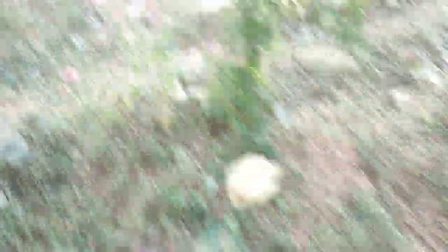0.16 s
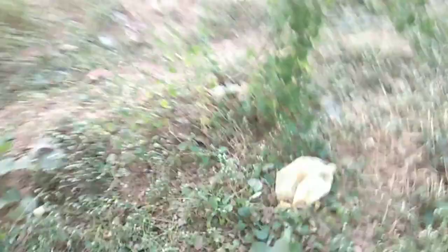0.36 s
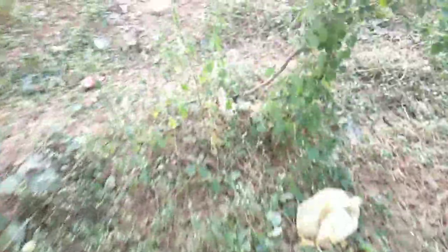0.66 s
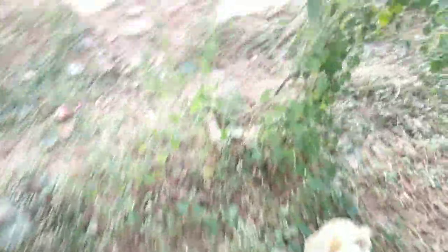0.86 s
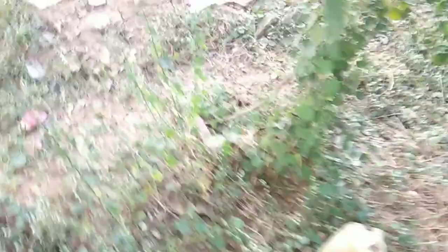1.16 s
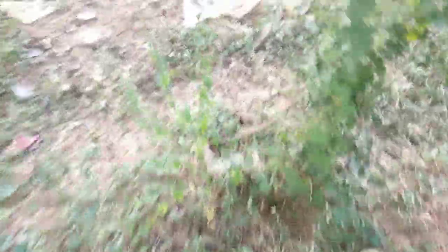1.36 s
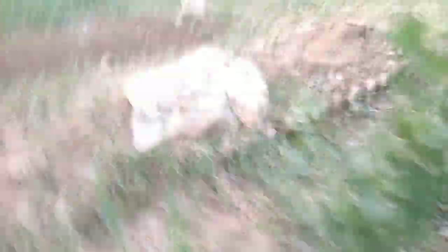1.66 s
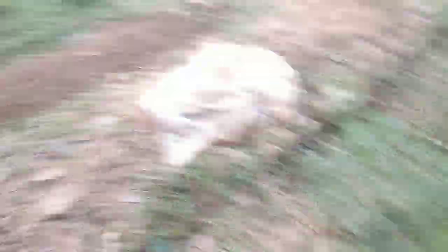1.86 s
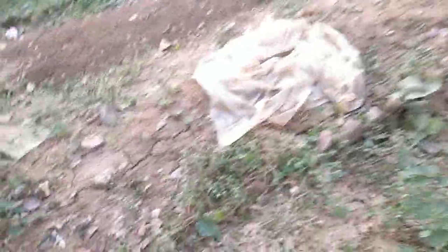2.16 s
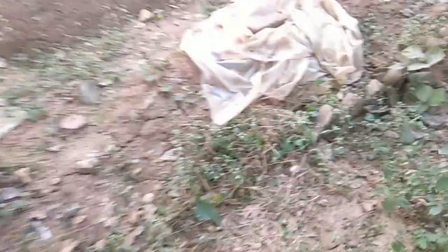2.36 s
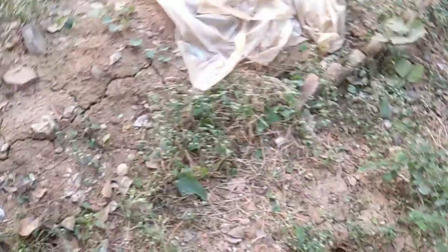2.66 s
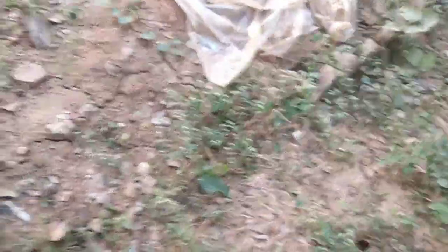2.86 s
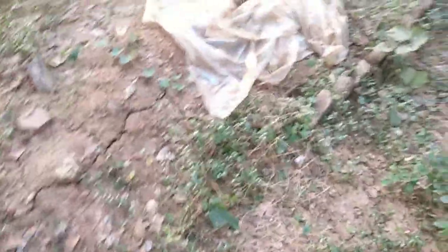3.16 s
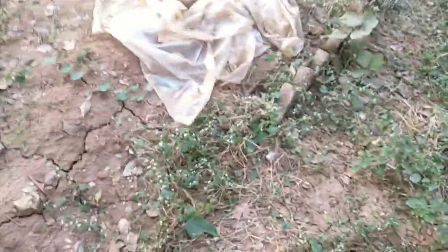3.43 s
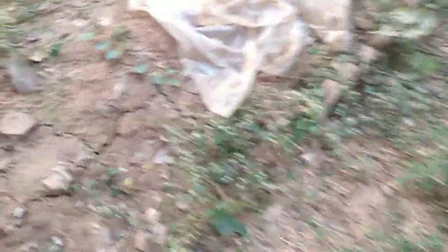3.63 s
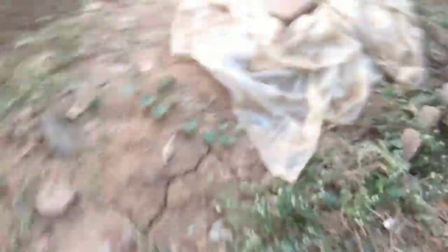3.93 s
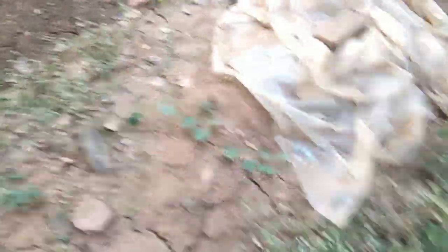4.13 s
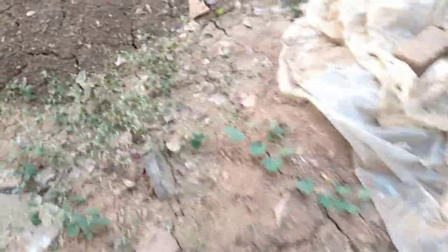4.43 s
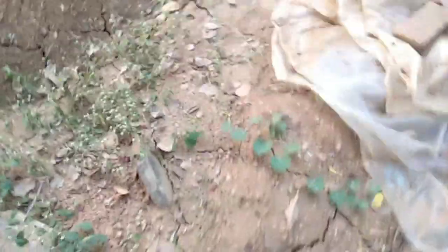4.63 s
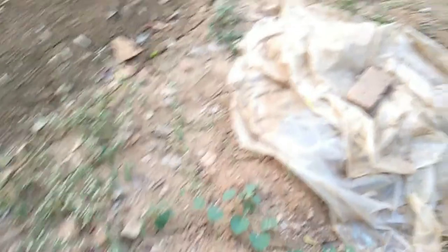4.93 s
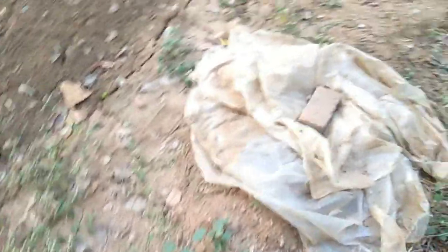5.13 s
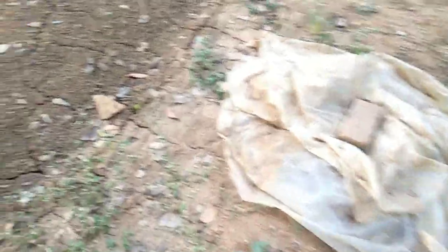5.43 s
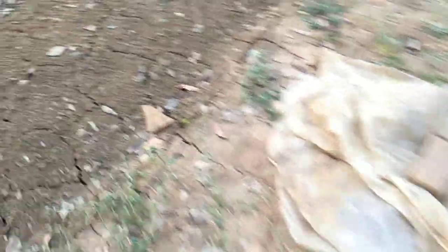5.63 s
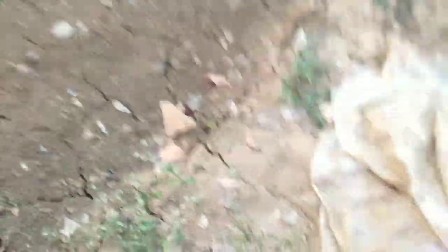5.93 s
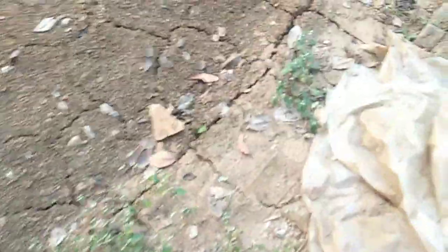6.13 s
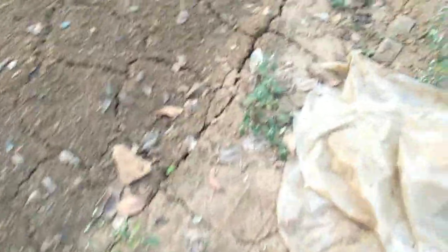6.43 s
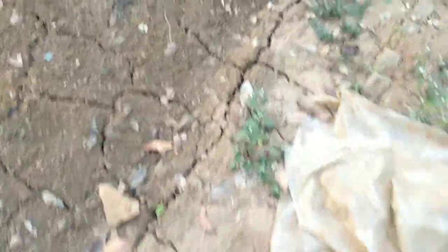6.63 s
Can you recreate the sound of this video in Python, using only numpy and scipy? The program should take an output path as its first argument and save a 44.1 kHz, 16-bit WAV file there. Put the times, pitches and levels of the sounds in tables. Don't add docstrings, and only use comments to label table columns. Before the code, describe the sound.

A walker moves through dry weeds over bare earth. First come scattered crunches and a low air thump at one second, then leafy brushing with short high chirps about four times a second. A cluster of sharp snaps peaks midway through the later part, followed by lighter rustling and two last crunches. Outdoors and dry, with no room echo, taken close on a small, thin-sounding handheld device.

```python
import sys
import numpy as np
from scipy import signal
from scipy.fft import rfft, irfft
from scipy.io import wavfile
from scipy.ndimage import uniform_filter1d

SR = 44100
rng = np.random.default_rng(int(sys.argv[2]) if len(sys.argv) > 2 else 0)


def generate_wav(sig):
    pcm = np.round(np.clip(np.atleast_2d(sig).T, -1, 1) * 32767).astype(np.int16)
    wavfile.write(sys.argv[1], SR, pcm)


def gain_from_decibels(decibels):
    exponent = np.asarray(decibels, float) / 20
    return 10 ** exponent


N = 299120

# full_weight_s, rise_s, fall_s, crackle_db, soil_share_db
STEPS = [(0.279, 0.023, 0.2, -36.5, -8), (.56, 0.05, 0.19, -64.5, 8), (.86, 0.15, 0.086, -53, 3),
         (0.944, 0.092, 0.077, -40, -8), (0.999, 0.18, 0.11, -36, -8.5), (1.38, 0.12, 0.23, -56.5, 4),
         (1.58, 0.022, 0.69, -52.5, -7.5), (1.769, 0.15, 0.17, -35.5, -11), (1.902, 0.049, 0.2, -48, -6),
         (2.489, 0.057, 0.2, -36, -9), (2.62, 0.039, 0.33, -45, -27), (2.755, 0.076, 0.043, -38, -18),
         (2.96, 1, 0.031, -54, -18), (3.12, 0.2, 0.11, -68, -20), (3.875, 0.046, 0.14, -36, -6.5),
         (3.909, 0.064, 0.072, -35.5, -27), (4.042, 0.15, 0.092, -53, 1), (4.494, 0.033, 0.18, -27.5, -24),
         (4.56, 0.094, 0.1, -37, -4.5), (4.62, 0.27, 0.023, -45, -20), (5.864, 0.045, 0.086, -42.5, -8.5),
         (6.775, 0.11, .1, -39, -9)]
STEP_LEAF_DB, STEP_HUSK_DB, STEP_STEM_DB = 1, -22.5, -19
# start_s, hold_s, swish_db, bright_share_db, husk_share_db
BRUSHES = [(0, 0.056, -55.5, -45, -44), (0.125, 0.17, -65.5, 1, -10), (0.548, 0.085, -59.5, -6, -6),
           (0.8, 0.12, -63.5, -4, 6), (1.538, 0.19, -44.5, -47, -22), (1.947, .12, -40.5, -57, -20),
           (2.144, 0.14, -42.5, -21.5, -48), (2.393, 0.071, -41.5, -20, -22), (2.483, 0.17, -53, -20, -1),
           (2.678, 0.15, -45.5, -25, -14), (3.032, 0.16, -49.5, -17, -15.5), (3.27, 0.075, -48, -20.5, -20),
           (3.347, 0.25, -43, -23, -17), (3.711, 0.15, -53.5, -11.5, -24),
           (4.154, .04, -35.5, -27.5, -20.5), (4.196, 0.097, -33, -20.5, -24.5),
           (4.414, 0.028, -44, -14, -20), (4.678, 0.051, -41.5, -10.5, -27),
           (4.78, 0.048, -34.5, -18.5, -20), (4.889, 0.11, -39, -20.5, -21), (5.206, 0.06, -56, -4.5, -14),
           (5.405, 0.11, -53, -9.5, -18), (5.671, 0.11, -49.5, -12, -26), (6.246, 0.13, -39, -12.5, -24),
           (6.674, 0.037, -50, -15, -13), (6.718, .08, -40, -10, -13)]
BRUSH_RISE_S, BRUSH_FALL_S = 0.04, 0.085
SWEEP_STALK_DB, SWEEP_STEM_DB = -4.5, 5
# start_s, hold_s, grind_db
SCUFFS = [(0.024, 0.12, -58.5), (0.317, 0.022, -44), (0.799, 0.066, -57.5), (1.405, 0.059, -49),
          (1.718, 0.062, -55), (1.976, 0.18, -65.5), (2.19, 0.083, -76), (2.645, 0.14, -59.5),
          (3.006, 0.039, -70), (3.31, 0.19, -67.5), (3.683, 0.099, -60), (4.259, 0.44, -63.5),
          (4.864, 0.64, -66.5), (5.615, 0.083, -60.5), (5.75, 0.041, -56), (5.894, 0.016, -58),
          (6.095, 0.039, -73), (6.298, 0.025, -60.5), (6.476, 0.19, -65.5)]
SCUFF_RISE_S, SCUFF_FALL_S = 0.018, 0.081
SWING_DB = 30
TAIL_BEND = 1.183
# rest_db of stalks, leaves, soil, husks and stems
REST_LEVELS = (-80.5, -73, -74, -74.5, -88)

# pitch_hz, level_db (per Hz)
STALK_TONE = [(2710, -33), (4600, -11.5), (5310, -4), (6110, -10), (7340, -2.5), (8790, -5.5), (9970, -10),
              (11100, -9.5), (14400, -59.5), (22000, -120)]
# pitch_hz, level_db (per Hz)
LEAF_TONE = [(1530, -62), (2600, -9), (2750, -1), (3510, -1.5), (3720, 0.5), (4800, -11), (5000, -6),
             (6500, -33), (11000, -120)]
# pitch_hz, level_db (per Hz)
SOIL_TONE = [(120, -18), (200, -8), (284, -8.5), (382, -4.5), (1150, -4), (1400, -23), (1900, -34.5),
             (2970, -120)]
# pitch_hz, level_db (per Hz)
HUSK_TONE = [(900, -47.5), (1300, -2), (1900, -4.5), (2300, 0), (2700, -7.5), (4000, -44)]
# pitch_hz, level_db (per Hz)
STEM_TONE = [(3500, -49), (4700, -11), (5200, -6), (5900, -7), (6500, -17.5), (7300, -8), (8000, -24.5),
             (11000, -39.5)]

# start_s, through_leaves_db, through_stalks_db
TWIGS = [(0.273, -48, -10), (0.441, -39, -32), (0.792, -54, -42), (0.853, -52, -25), (.932, -42, -23.5),
         (0.982, -38, -16), (1.365, -35, -32), (1.419, -35, -52), (1.715, -29, -33), (1.781, -24, -28),
         (2.146, -45, -30), (2.388, -30, -36), (2.472, -19.5, -36), (2.612, -23.5, -17), (2.683, -46, -28),
         (2.729, -40, -23), (2.75, -24, -16), (2.956, -41, -28.5), (3.062, -39, -37), (3.118, -46, -28.5),
         (3.261, -32, -62), (3.861, -41, -40), (3.908, -18.5, -32), (3.968, -29, -49), (4.422, -33, -47),
         (4.457, -42, -47.5), (4.478, -21, -27), (4.487, -14.5, -23), (4.498, -10, -3.5), (4.508, -16, -14),
         (4.514, -23, -28), (4.617, -43, -23), (4.693, -45.5, -29), (4.552, -13.5, -48), (5.778, -33, -57),
         (5.852, -29, -24), (5.865, -33, -14), (5.877, -28, -41), (6.085, -50, -61), (6.112, -49, -62),
         (6.308, -40, -27), (6.576, -52, -63), (6.663, -38, -36), (6.763, -23, -42)]
# start_s, level_db
CLODS = [(0.271, -43), (0.31, -54), (0.359, -36), (0.575, -54), (0.795, -34), (0.848, -54), (0.933, -43),
         (0.985, -44), (1.415, -43), (1.439, -51), (1.465, -57), (1.757, -26), (1.779, -26), (2.472, -41),
         (2.491, -27), (2.613, -47), (2.634, -51), (3.864, -39), (3.877, -33), (3.906, -19.5), (3.931, -53),
         (3.967, -36), (4.0, -54), (4.307, -44), (4.481, -42), (4.503, -34.5), (4.536, -35), (4.573, -39),
         (5.779, -47), (5.863, -34.5), (6.585, -42), (6.761, -55)]
# start_s, peak_db, pitch_hz
PODS = [(1.3658, -41.5, 2830), (1.409, -42, 2930), (1.5309, -42, 3640), (2.2363, -42, 4080),
        (3.046, -46, 3090), (3.4326, -39.5, 3800), (3.4467, -40, 3730), (3.718, -42.5, 4090),
        (3.7713, -44, 4120), (4.3615, -42, 3010), (4.4224, -32.5, 3070), (5.7795, -39, 3050),
        (5.8642, -32.5, 3106), (6.7216, -35.5, 3750)]
POD_T60_S, POD_DB = .04, 0.5

# start_s, peak_db, length_s
PUFFS = [(.127, -49.5, 0.084), (.307, -41, 0.047), (.341, -38.5, 0.041), (0.572, -40.5, 0.028),
         (0.766, -47, 0.016), (1.303, -56, 0.018), (1.674, -47, 0.11), (1.866, -40, 0.069),
         (2.402, -53, 0.036), (2.471, -34.5, 0.048), (2.616, -34, 0.047), (2.761, -49, 0.027),
         (2.829, -55, 0.14), (3.154, -59, 0.12), (3.282, -55.5, 0.1), (3.359, -40.5, 0.016),
         (3.418, -48, 0.12), (3.541, -43.5, 0.043), (3.653, -42, 0.05), (3.864, -31, 0.011),
         (4.574, -36, 0.031), (4.779, -45, 0.026), (4.904, -38.5, 0.022), (5.295, -41.5, 0.063),
         (5.656, -52.5, 0.064), (5.805, -40.5, 0.036), (5.882, -40, .039), (6.078, -49, 0.027),
         (6.477, -35, 0.057), (6.665, -36, 0.046)]
# start_s, peak_db
SLAPS = [(0.418, -38), (.933, -49), (0.989, -14.5), (1.092, -36.5), (2.038, -35), (3.937, -21.5),
         (4.002, -22.5), (4.156, -31), (4.292, -30.5), (4.663, -28), (6.357, -33), (6.585, -27)]
PUFF_HZ, SLAP_HZ, SLAP_S = 149.7, 157.6, 0.0071

# top_s, top_hz, rise_db, fall_db, half_pitch_db
ARCHES = [(2.222, 4400, -70, -60, -56), (2.428, 4600, -60, -42, -58), (2.642, 4800, -62, -44, -54),
          (2.866, 4650, -62, -43, -60), (3.092, 4500, -58, -43, -60), (3.286, 4900, -58, -42, -49),
          (3.524, 4500, -58, -40, -55), (3.752, 4650, -54, -50, -56), (3.982, 4700, -58, -43, -51),
          (4.215, 4650, -45, -40, -57), (4.452, 4500, -54, -44, -62), (4.692, 4500, -44, -47, -58),
          (4.935, 4500, -48, -42, -52), (5.176, 4500, -45, -44, -59), (5.432, 4450, -48, -46, -52),
          (5.706, 4450, -53, -47, -49), (6.292, 4300, -54, -38, -48), (6.745, 4400, -50, -44, -52)]
RISE_S, FALL_S, FOOT_HZ = .045, .060, 2800
FALL_FADE_DB, HALF_FADE_DB, RASP_HZ = 1.5, 17, 45
# start_s, length_s, from_hz, to_hz, level_db
SLURS = [(1.960, .055, 3450, 3050, -44), (2.000, .035, 2900, 2700, -47), (2.138, .018, 4600, 3800, -45),
         (2.178, .030, 3400, 3050, -43), (2.395, .035, 3450, 3000, -43), (2.612, .045, 3400, 2950, -44),
         (2.822, .045, 3500, 3000, -41), (2.915, .042, 2750, 3250, -40), (2.952, .040, 3750, 4500, -36),
         (2.890, .075, 4600, 6700, -43), (6.205, .04, 2650, 2850, -47), (3.055, .025, 3100, 3000, -40),
         (4.995, .08, 520, 515, -57)]

# pitch_hz, level_db (per Hz)
FIELD_TONE = [(35, -53.5), (60, -9), (104, -4), (167, 2), (302, -9), (723, -11.5), (1700, -22.5),
              (4240, -19), (4630, -24.5), (8350, -23.5), (11100, -30.5), (14400, -84), (22000, -120)]
FIELD_DB, HISS_DB, CUTOFF_HZ = -68.5, -92, 11640
# pitch_hz, level_db
PORT_TONE = [(20, 1.5), (2250, -3.5), (2560, -8), (2760, -1.5), (4450, 3), (4700, -4.5), (5000, -1.5),
             (22000, -5.5)]


def rms_one(x):
    return x / np.sqrt(np.mean(x ** 2) + 1e-20)


def colour(x, spectrum):
    hz, level_db = np.transpose(spectrum)
    grid = np.maximum(np.fft.rfftfreq(4096, 1 / SR), 1)
    curve_db = np.interp(np.log(grid), np.log(hz), np.maximum(level_db, -70))
    cepstrum = irfft(np.log(gain_from_decibels(curve_db)))
    cepstrum[1:2048] *= 2
    cepstrum[2049:] = 0
    return signal.fftconvolve(x, irfft(np.exp(rfft(cepstrum))))[:N]


def drift(rate, length=N):
    knots = rng.standard_normal(2000)
    return np.interp(np.arange(length) * rate / SR, np.arange(len(knots)), knots)


def grains(per_s, spread_db, clump_db):
    sizes = gain_from_decibels(spread_db * np.minimum(rng.exponential(1, N), 4)) * rng.standard_normal(N)
    chance = per_s * gain_from_decibels(clump_db * drift(45)) / SR
    clicks = sizes * (rng.random(N) < chance)
    return clicks / np.sqrt(uniform_filter1d(clicks ** 2, size=SR // 10) + 1e-3)


def patches(x, depth_db, open_share, sharpen):
    hz, s, z = signal.stft(x, SR, nperseg=1024, noverlap=768)
    band = (12 * np.log(1 + hz / 1500)).astype(int)
    chance = uniform_filter1d(rng.standard_normal((64, len(s))), size=9, axis=1)
    shared = uniform_filter1d(chance, size=5, axis=0)
    opening = .8 * rms_one(chance) + .6 * rms_one(shared) + open_share
    gain = gain_from_decibels(depth_db * np.tanh(3 * opening))[band]
    power = uniform_filter1d(np.abs(z) ** 2, size=7, axis=1) + 1e-20
    gain = gain * (power / uniform_filter1d(power, size=11, axis=0)) ** sharpen
    return rms_one(signal.istft(z * gain, SR, nperseg=1024, noverlap=768)[1][:N])


def tread():
    crackle = patches(grains(6000, 1.6, 7.0), depth_db=6, open_share=.2, sharpen=.5)
    swish = patches(grains(7000, 0.7, 4.0), depth_db=6.0, open_share=0.074, sharpen=1.0)
    grind = patches(grains(2500, 1.56, 3.6), depth_db=5, open_share=.1, sharpen=.8)
    rasp = patches(grains(4000, 0.7, 3.0), depth_db=6.0, open_share=-0.4, sharpen=1.0)
    sweep = swish[::-1]
    layers = [(-2.0, crackle, STALK_TONE), (-8.5, swish, LEAF_TONE), (-1.9, grind, SOIL_TONE),
              (-0.5, rasp, HUSK_TONE), (-5.0, sweep, STEM_TONE)]
    out = np.zeros(N)
    for gain, (level_db, clicks, body) in zip(gestures(), layers):
        out += gain * gain_from_decibels(level_db) * rms_one(colour(clicks, body))
    return out


def gestures():
    s, rise, fall, step_db, soil_db = np.transpose(STEPS)
    step_shares = 0, STEP_LEAF_DB, soil_db, STEP_HUSK_DB, STEP_STEM_DB
    step = [strokes(s, 0, step_db + share, rise, fall) for share in step_shares]
    s, hold, brush_db, bright_db, husk_db = np.transpose(BRUSHES)
    brush_shares = bright_db + SWEEP_STALK_DB, 0, husk_db, bright_db + SWEEP_STEM_DB
    brush = [strokes(s, hold, brush_db + share, BRUSH_RISE_S, BRUSH_FALL_S) for share in brush_shares]
    brush.insert(2, strokes(*np.transpose(SCUFFS), SCUFF_RISE_S, SCUFF_FALL_S))
    return [np.sqrt(a ** 2 + b ** 2 + gain_from_decibels(2 * rest_db)) for a, b, rest_db in zip(step, brush, REST_LEVELS)]


def strokes(s, hold, level_db, rise, fall):
    t = np.arange(0, N + 32, 32) / SR - np.asarray(s)[:, None]
    before = -t / np.reshape(rise, (-1, 1))
    after = (t - np.reshape(hold, (-1, 1))) / np.reshape(fall, (-1, 1))
    away = np.maximum(np.maximum(before, after), 0)
    drop_db = SWING_DB * away ** np.where(t > 0, TAIL_BEND, 1)
    power = gain_from_decibels(2 * (level_db[:, None] - drop_db)).sum(axis=0)
    return np.interp(np.arange(N) / 32, np.arange(len(power)), np.sqrt(power))


def snaps():
    twig_s, leaf_db, stalk_db = np.transpose(TWIGS)
    clod_s, clod_db = np.transpose(CLODS)
    t = np.arange(800) / SR
    shape = t ** 3 * np.exp(-t / .0009) + 2e-7 * t * np.exp(-t / .0035)
    bursts = rng.standard_normal((len(twig_s), len(t))) * shape
    bursts /= np.linalg.norm(bursts, axis=1)[:, None]
    breaks = [(twig_s, leaf_db + 5, LEAF_TONE), (twig_s, stalk_db + 3, STALK_TONE),
              (clod_s, clod_db + 12, SOIL_TONE)]
    out = np.zeros(N)
    for s, level_db, body in breaks:
        hits = np.zeros(N + len(t))
        places = (s * SR - 80).astype(int)[:, None] + np.arange(len(t))
        np.add.at(hits, places, gain_from_decibels(level_db)[:, None] * bursts[:len(s)])
        unit = np.linalg.norm(colour(signal.unit_impulse(N), body))
        out += colour(hits[:N], body) / unit
    return out


def pods():
    out = np.zeros(N + SR)
    t = np.arange(SR // 20) / SR
    for s, peak_db, hz in PODS:
        envelope = np.minimum(t / .002, 1) * gain_from_decibels(peak_db + POD_DB - 60 * t / POD_T60_S)
        start = round((s - .002) * SR)
        out[start:start + len(t)] += envelope * np.sin(2 * np.pi * hz * t)
    return out[:N]


def wind():
    out, wobble = np.zeros(N), drift(70)
    puffs = [(s, peak_db, length, PUFF_HZ) for s, peak_db, length in PUFFS]
    slaps = [(s, peak_db, SLAP_S, SLAP_HZ) for s, peak_db in SLAPS]
    for s, peak_db, length, hz in puffs + slaps:
        at = np.arange(round((s - .004) * SR), min(N, round((s + 3 * length) * SR)))
        t = (at - at[0]) / SR
        phase = 2 * np.pi * np.cumsum(hz * (1 + 0.251 * wobble[at])) / SR
        flutter = gain_from_decibels(4 * np.tanh(wobble[at - 900]))
        envelope = np.minimum(t / .008, 1) * np.exp(-(t / length) ** 2) * flutter
        tone = np.sin(phase) + 0.37 * np.sin(2.1 * phase) + 0.097 * np.sin(3.5 * phase)
        out[at] += gain_from_decibels(peak_db - 6.5) * envelope * tone
    return out


def birds():
    calls = np.zeros(N)
    t = np.arange(-RISE_S, FALL_S, 1 / SR)
    bend = np.where(t < 0, (np.abs(t) / RISE_S) ** 2.4, (np.abs(t) / FALL_S) ** 1.4)
    for s, top_hz, rise_db, fall_db, half_db in ARCHES:
        hz = top_hz - (top_hz - FOOT_HZ) * bend
        level_db = np.interp(t, [-.012, .012], [rise_db + 2, fall_db + 2]) - FALL_FADE_DB * bend * (t > 0)
        at, call = whistle(s - RISE_S, hz, level_db, .6)
        calls[at] += call
        at, half = whistle(s - RISE_S, hz / 2, half_db + 2 - HALF_FADE_DB * bend, .1)
        calls[at] += half
    for s, length, from_hz, to_hz, level_db in SLURS:
        hz = np.linspace(from_hz, to_hz, round(length * SR))
        at, call = whistle(s - .005, hz, level_db + 1, .4)
        calls[at] += call
    calls *= gain_from_decibels(2.5 * np.tanh(drift(90)) + 4 * np.tanh(drift(290)) - 2.5)
    return gain_from_decibels(-2.5) * calls + gain_from_decibels(-9) * scatter(calls, .005) + gain_from_decibels(-9) * scatter(calls, .04)


def whistle(s, hz, level_db, quaver):
    at = round(s * SR) + np.arange(len(hz))
    phase = 2 * np.pi * np.cumsum(hz + RASP_HZ * drift(500, len(hz))) / SR
    phase = phase + quaver * np.sin(2 * np.pi * 230 * at / SR)
    fade = signal.windows.tukey(len(hz), .2)
    tone = gain_from_decibels(level_db) * fade * np.sin(phase)
    return at[at < N], tone[at < N]


def scatter(x, decay_s):
    lag = np.arange(SR // 4) / SR
    echoes = rng.standard_normal(len(lag)) * np.exp(-lag / decay_s)
    return signal.fftconvolve(x, echoes / np.linalg.norm(echoes))[:N]


def far_rustle():
    air = rng.standard_normal(N)
    twitter = patches(air, depth_db=6.0, open_share=-0.6, sharpen=0.6)
    twitter = signal.sosfilt(signal.butter(2, 280, "high", fs=SR, output="sos"), twitter)
    steady = gain_from_decibels(-7) * air[::-1]
    return gain_from_decibels(FIELD_DB) * rms_one(colour(twitter + steady, FIELD_TONE))


def scene():
    return (tread() + snaps() + pods() + wind() + birds() + far_rustle())[None]


def low_pass(x):
    return signal.sosfilt(signal.butter(12, 15460, fs=SR, output="sos"), x)


def record(dry):
    x = colour(dry[0], PORT_TONE)
    x = signal.sosfilt(signal.butter(6, 105, "high", fs=SR, output="sos"), x)
    x = signal.sosfilt(signal.cheby2(10, 60, CUTOFF_HZ, fs=SR, output="sos"), x)
    hiss = gain_from_decibels(HISS_DB) * rng.standard_normal(N)
    return low_pass((x + hiss)[None])


dry = scene()
out = record(dry)
generate_wav(out)
```